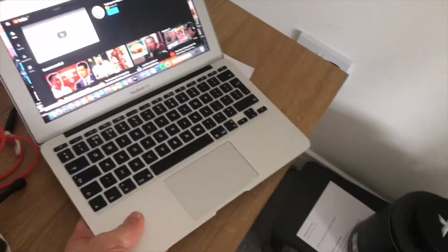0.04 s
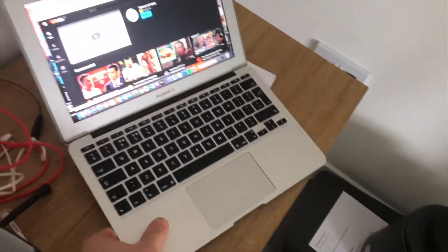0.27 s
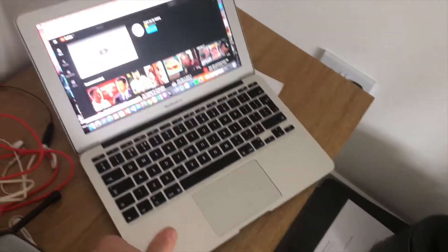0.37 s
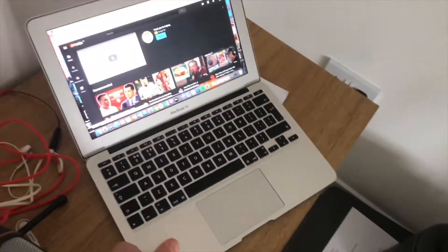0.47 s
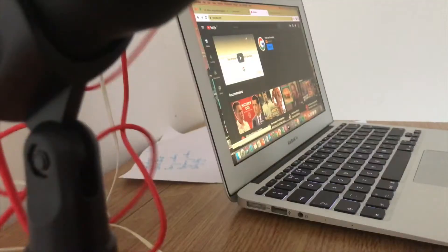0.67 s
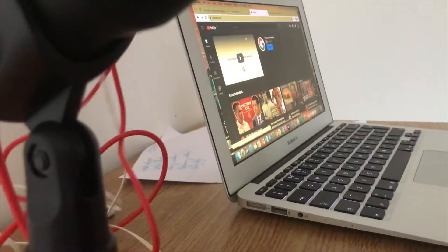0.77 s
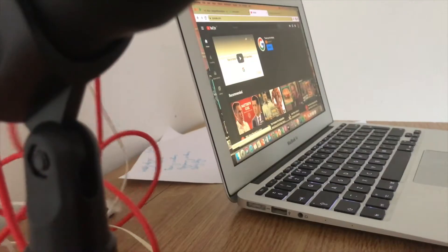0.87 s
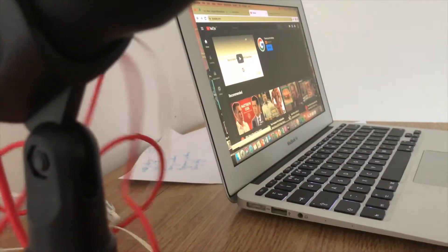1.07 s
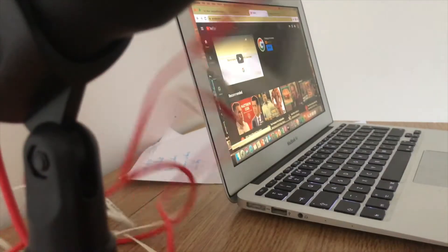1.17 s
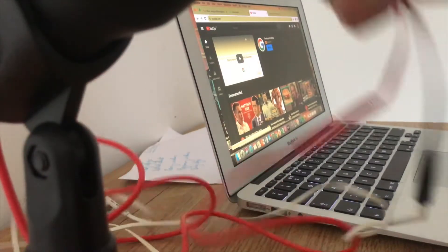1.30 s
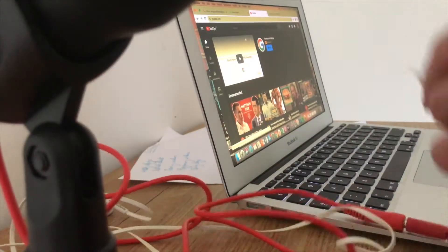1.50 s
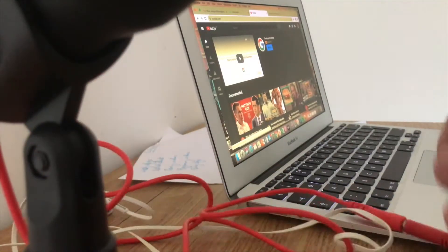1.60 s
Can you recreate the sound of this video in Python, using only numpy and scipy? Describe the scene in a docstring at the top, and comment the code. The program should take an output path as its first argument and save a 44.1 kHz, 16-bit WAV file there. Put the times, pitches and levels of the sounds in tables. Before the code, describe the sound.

A metal laptop is set down on a wooden desk with a few quick knocks and low thumps. A hand slides off the case, then cables drop with light plug clacks, close by in a small quiet room.

```python
"""Laptop and cables on a desk

A metal laptop is set down on a wooden desk: its edges knock, and the desk top booms under its weight.
A hand slides on the case and lets go; then a bundle of cables drops, plugs clacking and loops
flopping and slithering. A small quiet room answers each knock."""
import sys
import numpy as np
from scipy import signal
from scipy.fft import rfft, irfft
from scipy.io import wavfile

SR = 44100
rng = np.random.default_rng(int(sys.argv[2]) if len(sys.argv) > 2 else 0)


def generate_wav(signal):
    """Clip the signal to [-1, 1] and save it as 16-bit WAV at the path in sys.argv[1]."""
    frames = np.transpose(np.atleast_2d(signal))
    scaled = np.clip(frames, -1, 1) * 32767
    pcm = np.round(scaled).astype(np.int16)
    wavfile.write(sys.argv[1], SR, pcm)


N = 72765
TIME = np.arange(N) / SR
FREQ = np.maximum(np.arange(N + 1) * SR / (2 * N), 1)


def amp(db):
    """Decibels to gain."""
    return 10 ** (np.asarray(db) / 20)


def at(points, hz):
    """Read (Hz, value) points on a log-frequency axis."""
    freqs, values = np.array(points, float).T
    return np.interp(np.log(hz), np.log(freqs), values)


def unit(x):
    """Scale to an energy of one."""
    return x / np.sqrt(np.sum(x ** 2) + 1e-18)


def add(out, start_s, x):
    """Mix a sound in at a time."""
    i = int(np.clip(start_s * SR, 0, N - 1))
    out[i:i + len(x)] += x[:N - i]


def colour(x, gain_db):
    """Minimum-phase EQ, its gains running from zero to half the sample rate."""
    n = len(x)
    cepstrum = irfft(gain_db * np.log(10) / 20)
    cepstrum[1:n] *= 2
    cepstrum[n + 1:] = 0
    return irfft(rfft(x, 2 * n) * np.exp(rfft(cepstrum)))[:n]


def bands(low_hz, count):
    """Half-octave band-passes as (centre, filter)."""
    centres = low_hz * 2 ** (np.arange(count) / 2)
    return [(hz, signal.butter(2, [hz / 2 ** .25, hz * 2 ** .25], "band", fs=SR, output="sos"))
            for hz in centres]


def noise(eq):
    """Coloured noise with an rms of one."""
    spectrum = rfft(rng.standard_normal(2 * N)) * amp(at(eq, FREQ))
    return unit(irfft(spectrum)[:N]) * np.sqrt(N)


def rubbing(fader, eq, grains_per_s=120, grain_db=1.5):
    """Grainy friction noise whose level follows the movement."""
    times, levels = np.array(fader).T
    level_db = np.interp(TIME, times, levels, left=-120, right=-120)
    grain = np.interp(TIME * grains_per_s, np.arange(N), rng.standard_normal(N))
    return noise(eq) * amp(level_db + grain_db * grain)


# Room tone: freq_hz, gain_db
AIR_EQ = [(20, 7), (35, -3), (53, 2), (100, -19), (170, -15.5), (270, -13.5), (440, -23.5), (1100, -22.5),
          (1650, -30), (9000, -39), (16000, -42.5)]


def air():
    """A faint, steady bed of bass-heavy air noise."""
    return amp(-62) * noise(AIR_EQ)


# Handling rumble. Fader: time_s, level_db. EQ: freq_hz, gain_db
CARRY_FADER = [(0, -54), (.07, -50.5), (.2, -60), (.35, -63), (.55, -47), (.68, -67.5)]
CARRY_EQ = [(20, -8), (48, -12), (90, -9.5), (150, -4), (220, -20), (600, -25.5), (2000, -33.5),
            (10000, -77)]


def hand_carry():
    """The hand carrying the laptop makes a low rumble."""
    return rubbing(CARRY_FADER, CARRY_EQ)


# Skin on the case. Fader: time_s, level_db. EQ: freq_hz, gain_db
SLIDE_FADER = [(0, -77), (.06, -76), (.1, -64), (.17, -60), (.24, -57.5), (.3, -56.5), (.35, -58),
               (.43, -67), (.6, -73.5)]
SLIDE_EQ = [(200, -9), (1000, -4.5), (3000, -5.5), (6000, -6.5), (10000, -10), (15000, -9)]


def hand_slide():
    """The hand slides on the case with a broad hiss."""
    return rubbing(SLIDE_FADER, SLIDE_EQ)


def crack(spectrum, size=2048, low_cut_hz=190):
    """The attack of a hit: one sharp pulse, shaped by band levels and thinned in the bass."""
    hz = np.maximum(np.linspace(0, SR / 2, size + 1), 1)
    density_db = at(spectrum, hz) + 10 * np.log10(SR / (np.log(2) * hz))
    low_cut_db = -10 * np.log10(1 + (low_cut_hz / hz) ** 4)
    return colour(signal.unit_impulse(size), density_db + low_cut_db)


def ring_envelope(t, hz, t60_s, rise_s=0.00023, bass_hz=407):
    """A fast rise, then a decay that stretches beyond t60_s toward the bass."""
    decay = amp(-60 * t / (t60_s * (1 + bass_hz / hz)))
    return (1 - np.exp(-t / rise_s)) * decay


# Body, knock, clack and tick bands of a hit: centre_hz
HIT_BANDS = [330, 1150, 3500, 10000]
# Strength of the main pitch within the ring: pitch_hz, gain_db
PITCH_EMPHASIS = [(250, 3), (700, 7.5), (1500, -5.5), (4000, 1.5)]


def hits(events, resonances, snap, pitch_hold=1.3, ring_send_db=-5.5):
    """Each hit cracks, then rings; snap weighs crack against ring. Returns direct sound and room send."""
    cracks, ring = np.zeros(N), np.zeros(N)
    t = TIME[:SR // 5]
    bank = bands(low_hz=230, count=13)
    for start_s, _, *levels_db, t60_s, pitch_hz in events:
        spectrum = list(zip(HIT_BANDS, levels_db))
        add(cracks, start_s, crack(spectrum))
        held = ring_envelope(t, pitch_hz, t60_s) ** (1 / pitch_hold)
        tone = unit(np.sin(2 * np.pi * pitch_hz * t) * held)
        add(ring, start_s, tone * amp(at(spectrum, pitch_hz) + at(PITCH_EMPHASIS, pitch_hz)))
        for hz, sos in bank:  # noise bands stand for the many other modes
            burst = rng.standard_normal(len(t)) * ring_envelope(t, hz, t60_s)
            add(ring, start_s, unit(signal.sosfilt(sos, burst)) * amp(at(spectrum, hz)))
    peaks_db = sum(db / (1 + (2 * (FREQ - hz) / width) ** 2) for hz, width, db in resonances)
    direct = colour(snap * cracks + ring, peaks_db) / np.hypot(1, snap)
    send = colour(cracks + amp(ring_send_db) * ring, peaks_db)
    return np.array([direct, send])


# Laptop edges landing: start_s, boom_db, body_db, knock_db, clack_db, tick_db, t60_s, pitch_hz
LAPTOP_HITS = [(0.0185, -42, -39, -49, -58, -76, 0.035, 795),
               (0.0229, -38.5, -39.5, -45.5, -60.5, -70, 0.022, 568),
               (0.2402, -37, -36.5, -34, -41.5, -56, 0.017, 270),
               (0.2782, -72, -50, -55, -42.5, -46, 0.018, 3110),
               (0.3599, -19, -35.5, -35, -29, -43.5, 0.02, 4330),
               (0.4289, -58, -35, -30.5, -27.5, -53, 0.015, 1352),
               (0.4317, -30.5, -27.5, -38.5, -28.5, -37.5, 0.015, 290),
               (0.5458, -50.5, -46, -48.5, -47.5, -68, 0.029, 1673),
               (0.6491, -56, -57, -54, -59.5, -74, 0.01, 1600),
               (0.6620, -80, -70, -70, -59, -68, 0.023, 5230),
               (0.6876, -61, -73, -53.5, -57, -92, 0.093, 2370),
               (0.864, -84, -78, -77, -72, -73, 0.0055, 5150), (1.078, -63, -77, -66, -82, -75, .016, 1090)]
# Resonances of the metal case: centre_hz, width_hz, boost_db
CASE_PEAKS = [(378, 75, 3.5), (900, 85, 5), (1050, 130, 0), (1430, 140, 3), (1684, 650, 5.5),
              (2830, 650, 5.5), (4220, 600, 2), (6050, 1250, 4.5), (14260, 1900, 4.5)]


def laptop_knocks():
    """The laptop's edges knock on the wood and its metal case rings briefly."""
    return amp(18) * hits(LAPTOP_HITS, CASE_PEAKS, snap=0.52)


# Modes of the wooden desk top: pitch_hz, level_db, t60_s
DESK_MODES = [(52, -18.5, 0.5), (87.35, -2, 0.29), (137.2, 0, 0.33), (156.7, -6.5, 0.49),
              (232.6, -4.5, 0.12), (280.4, -1.5, 0.1), (392.1, -10, 0.19), (526.6, -14, 0.23)]


def desk_boom(events, trim_db=-0.5, rise_s=0.0012, boom_top_hz=175, body_low_hz=215):
    """Every blow rings the desk top: its weight drives the low modes, its body band the upper ones."""
    rise = 1 - np.exp(-TIME / rise_s)
    out = np.zeros(N)
    for hz, level_db, t60_s in DESK_MODES:
        ring = rise * amp(trim_db + level_db - 60 * TIME / t60_s) * np.sin(2 * np.pi * hz * TIME)
        for start_s, boom_db, body_db, *_ in events:
            drive_db = at([(boom_top_hz, boom_db), (body_low_hz, body_db)], hz)
            add(out, start_s, amp(drive_db) * ring)
    return out


# Tone of the reflections: freq_hz, level_db
ROOM_EQ = [(100, 4), (300, -8.5), (1000, -4.5), (3000, -8.5), (7000, -7.5), (14000, -6)]
# Length of the tail: freq_hz, t60_s
ROOM_DECAY = [(100, 1), (1000, 0.32), (4000, 0.45), (14000, 0.15)]


def room(send, predelay_s=0.0037, early_db=9, early_t60_s=0.16):
    """Quick reflections from near surfaces, then a diffuse tail that dies sooner in the treble."""
    onset = np.clip(TIME / predelay_s - 1, 0, 1)
    early = amp(early_db - 60 * TIME / early_t60_s)
    response = np.zeros(N)
    for hz, sos in bands(low_hz=81, count=16):
        tail = amp(-60 * TIME / at(ROOM_DECAY, hz))
        reflections = signal.sosfilt(sos, rng.standard_normal(N)) * (early + tail) * onset
        band_share = np.log(2) * hz / SR
        response += unit(reflections) * amp(at(ROOM_EQ, hz)) * np.sqrt(band_share)
    return signal.fftconvolve(send, response)[:N]


# The grip loosening. Fader: time_s, level_db. EQ: freq_hz, gain_db
SCUFF_FADER = [(.55, -86), (.66, -60.5), (.72, -57), (.8, -60), (.92, -62), (1.0, -70), (1.15, -67.5),
               (1.26, -68)]
SCUFF_EQ = [(120, 0), (260, 8), (500, -9), (800, 0.5), (1500, -5.5), (3000, -14), (6000, -24), (15000, -27)]


def hand_scuff():
    """A dull scuff as the hand lets go."""
    return rubbing(SCUFF_FADER, SCUFF_EQ)


# Two light brushes of skin. Fader: time_s, level_db. EQ: freq_hz, gain_db
SWISH_FADER = [(.65, -80), (.69, -67.5), (.76, -74), (.82, -90), (.9, -80), (.96, -70), (1.0, -86)]
SWISH_EQ = [(2000, -14), (7000, -4), (10000, -9.5), (11300, -5.5), (12500, 5), (14000, -2), (16000, -0.5)]


def skin_swish():
    """Skin leaves the metal with a thin hiss."""
    return rubbing(SWISH_FADER, SWISH_EQ)


# Cable friction. Fader: time_s, level_db. EQ: freq_hz, gain_db
SLITHER_FADER = [(1.05, -77.5), (1.25, -65.5), (1.29, -57), (1.39, -54), (1.46, -55), (1.53, -57),
                 (1.6, -58), (1.65, -62.5)]
SLITHER_EQ = [(25, 5), (50, 9.5), (100, 1), (200, 9), (450, -4), (1000, -2.5), (3000, -7.5), (7000, -17),
              (15000, -15)]


def cable_slither():
    """The cables rub and slither as the bundle drops."""
    return rubbing(SLITHER_FADER, SLITHER_EQ)


# Plugs and loops landing: start_s, boom_db, body_db, knock_db, clack_db, tick_db, t60_s, pitch_hz
CABLE_HITS = [(1.2678, -68, -84, -60, -54, -90, 0.062, 2130),
              (1.2729, -70, -67, -64, -72, -66, 0.003, 6400),
              (1.2789, -75, -54, -50.5, -41, -52.5, 0.032, 2870),
              (1.3032, -74, -57.5, -49, -41, -47, 0.016, 4050),
              (1.3307, -61, -67, -49.5, -53.5, -91, 0.06, 1216),
              (1.3690, -55, -46, -58, -59, -76, 0.019, 190),
              (1.3849, -82, -51, -47, -39.5, -64, 0.017, 3200),
              (1.412, -79, -51.5, -53, -43.5, -57, 0.0084, 3290),
              (1.4648, -60, -51.5, -48.5, -65, -91, 0.0066, 730),
              (1.4860, -52.5, -58, -55.5, -56, -96, 0.039, 1916),
              (1.516, -70, -57, -56.5, -60.5, -82, 0.026, 2850),
              (1.5420, -59, -53.5, -75, -76, -71, 0.013, 229),
              (1.6321, -57, -56.5, -57.5, -78, -73, 0.025, 780)]
# Resonances of the plugs: centre_hz, width_hz, boost_db
PLUG_PEAKS = [(193, 140, 9.4), (647, 31, 10.6), (887, 67, 6.8), (2090, 120, 8.7), (3000, 220, 7.7),
              (3360, 130, 3.4), (4160, 140, 5.5), (5450, 1300, 4.9), (8000, 4500, 8.9)]


def cable_drop():
    """Plugs clack and cable loops flop onto the desk."""
    return amp(17) * hits(CABLE_HITS, PLUG_PEAKS, snap=1)


def scene():
    """Laptop, cables and desk in the room, with handling noise, over faint air noise."""
    laptop, laptop_send = laptop_knocks()
    cables, cable_send = cable_drop()
    desk = desk_boom(LAPTOP_HITS + CABLE_HITS)
    reverb = room(amp(-1) * laptop_send + amp(-6.5) * cable_send)
    hand = hand_carry() + hand_slide() + hand_scuff() + skin_swish()
    return (laptop + cables + desk + reverb + hand + cable_slither() + air())[None]


def record(dry, low_cut_hz=42, high_cut_hz=15900):
    """The microphone loses the deepest bass and the very top."""
    thinned = signal.sosfilt(signal.butter(4, low_cut_hz, "high", fs=SR, output="sos"), dry)
    return signal.sosfilt(signal.ellip(10, .2, 70, high_cut_hz, fs=SR, output="sos"), thinned)


dry = scene()
out = record(dry)
generate_wav(out)
```